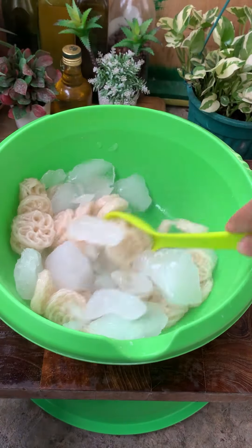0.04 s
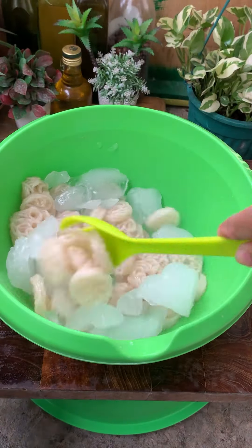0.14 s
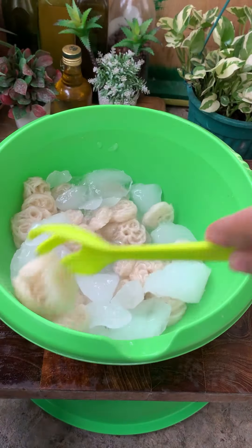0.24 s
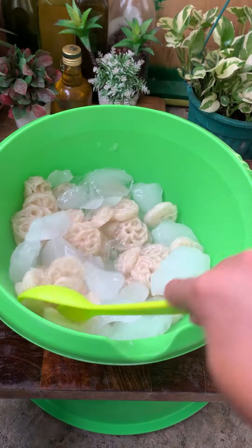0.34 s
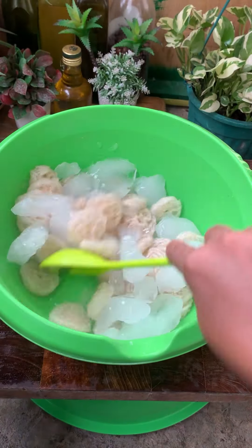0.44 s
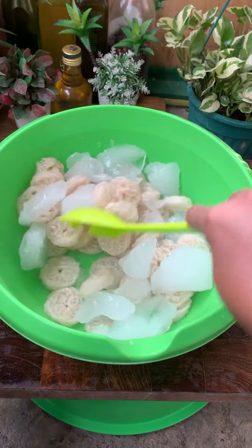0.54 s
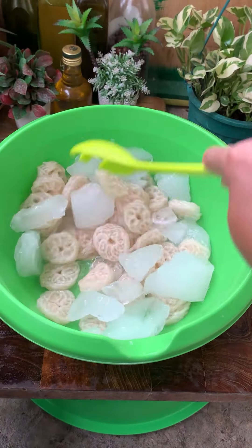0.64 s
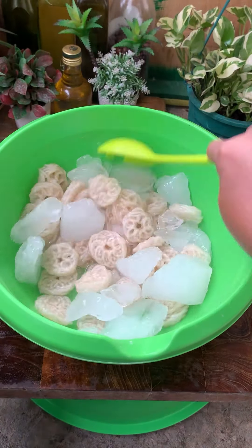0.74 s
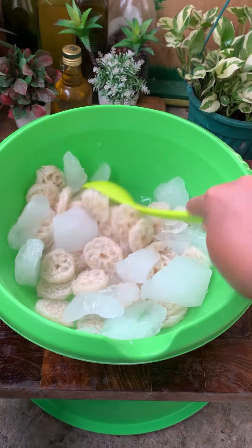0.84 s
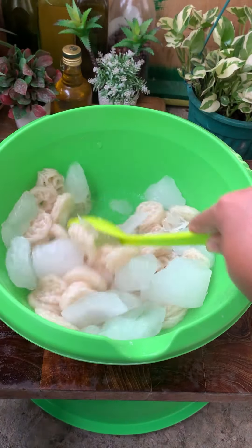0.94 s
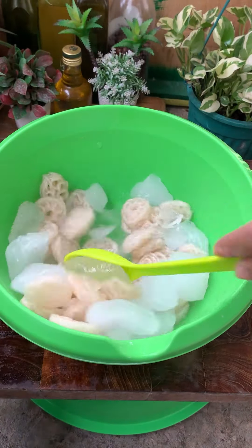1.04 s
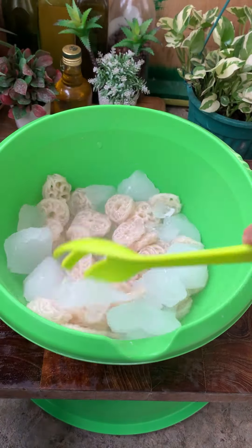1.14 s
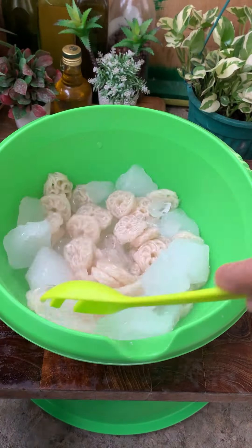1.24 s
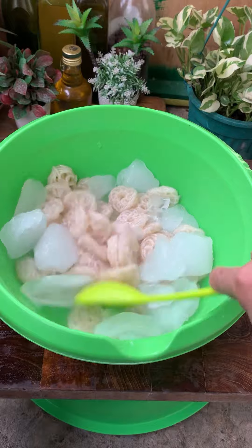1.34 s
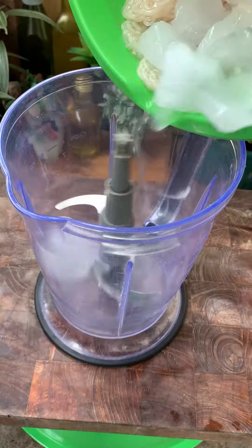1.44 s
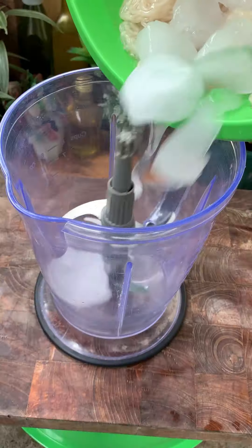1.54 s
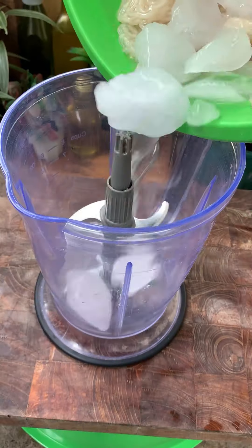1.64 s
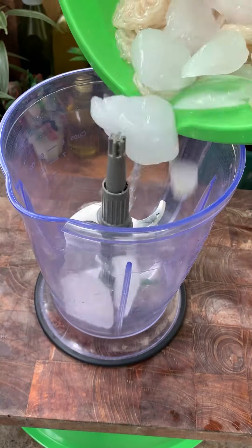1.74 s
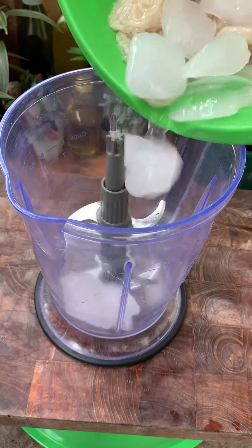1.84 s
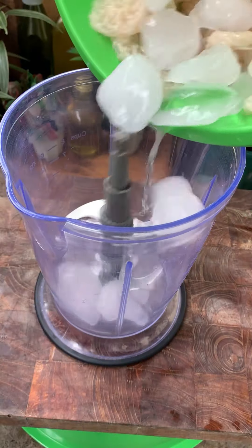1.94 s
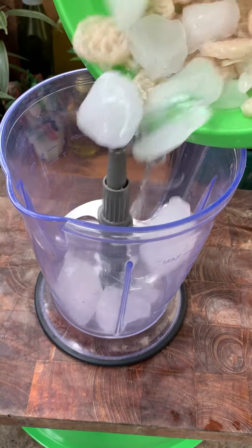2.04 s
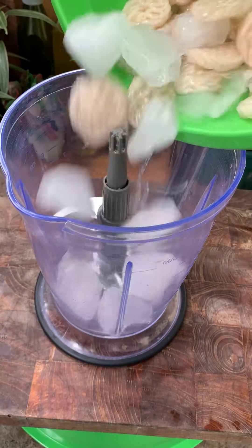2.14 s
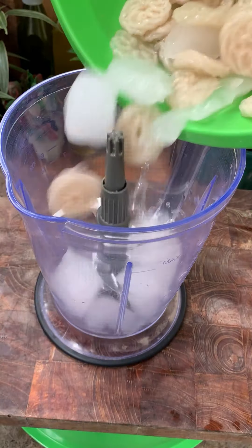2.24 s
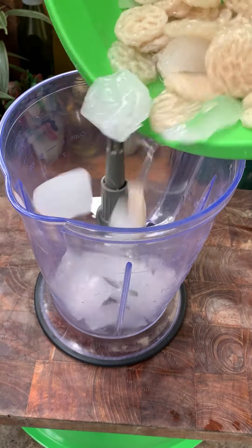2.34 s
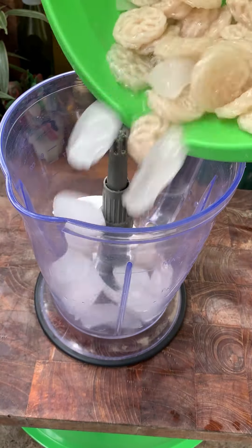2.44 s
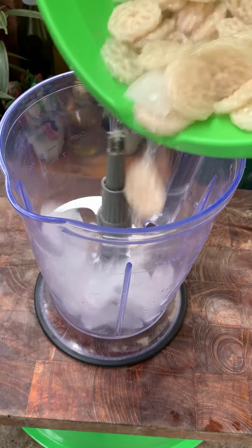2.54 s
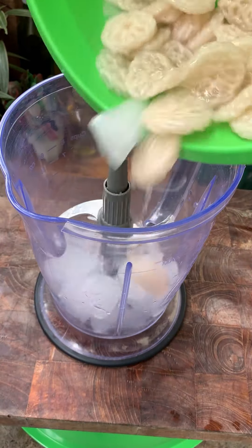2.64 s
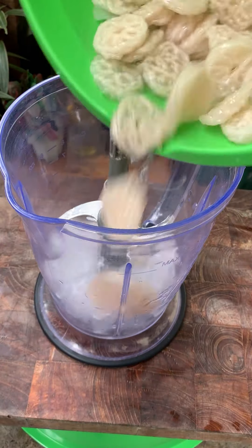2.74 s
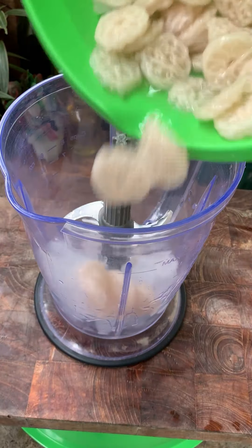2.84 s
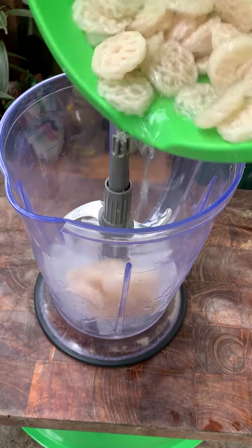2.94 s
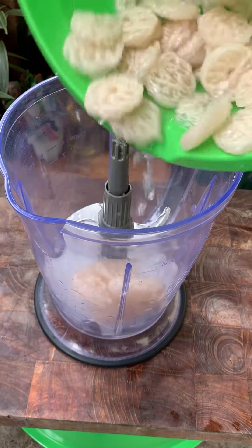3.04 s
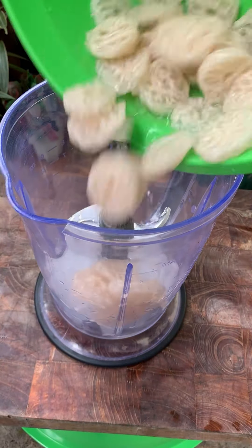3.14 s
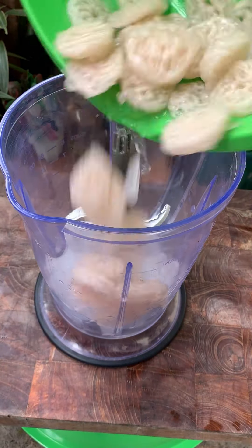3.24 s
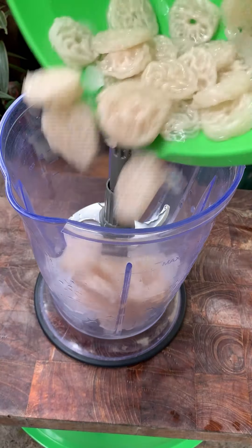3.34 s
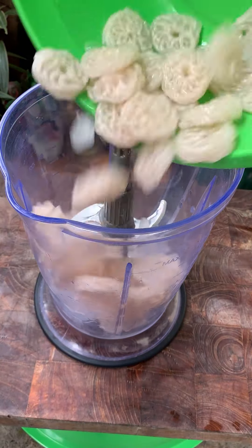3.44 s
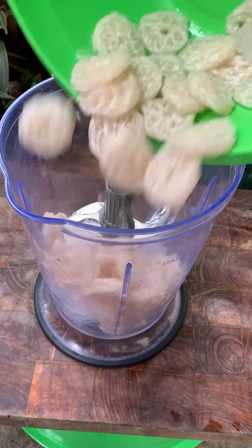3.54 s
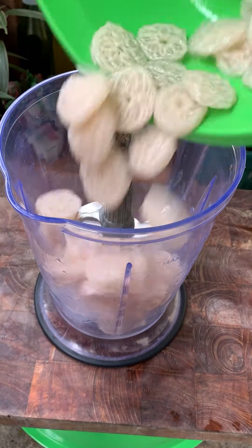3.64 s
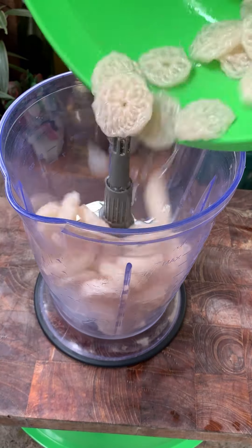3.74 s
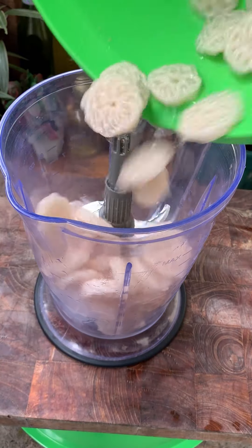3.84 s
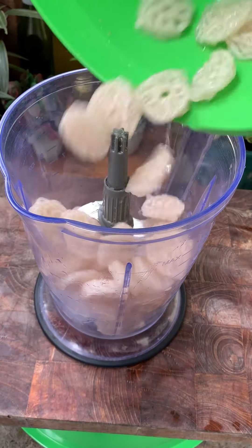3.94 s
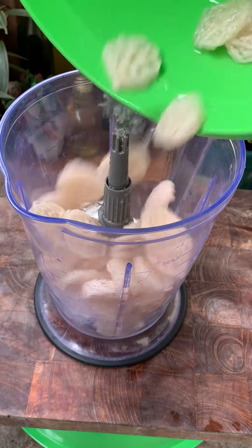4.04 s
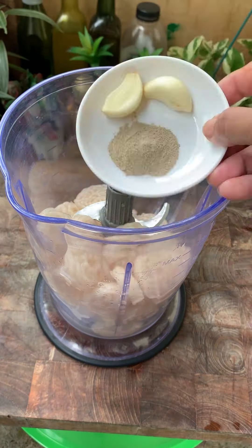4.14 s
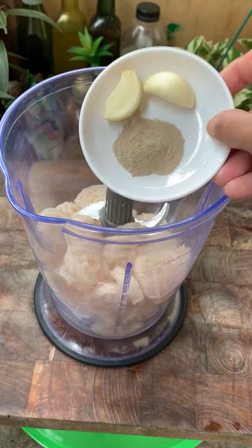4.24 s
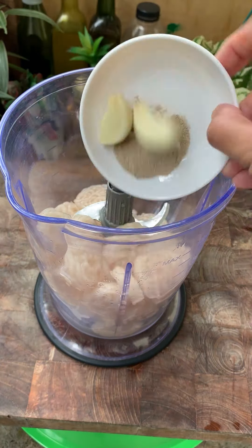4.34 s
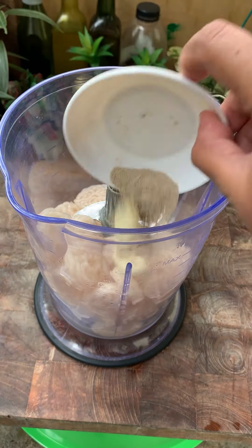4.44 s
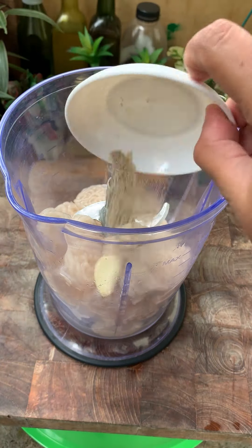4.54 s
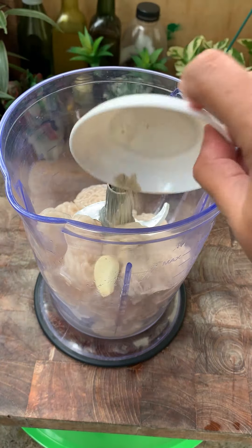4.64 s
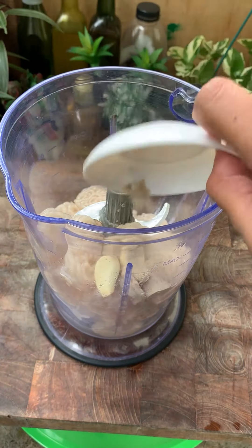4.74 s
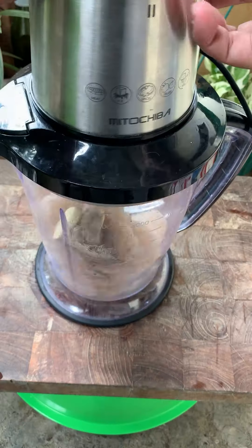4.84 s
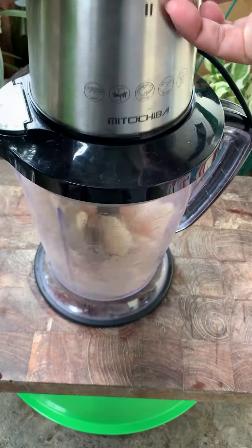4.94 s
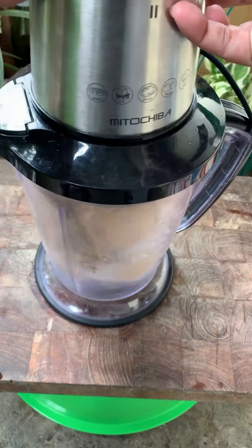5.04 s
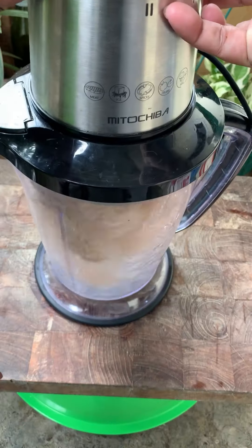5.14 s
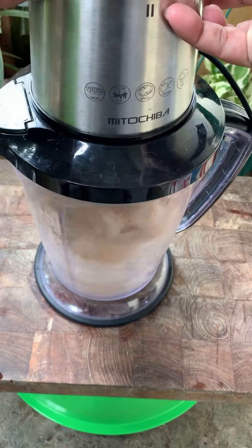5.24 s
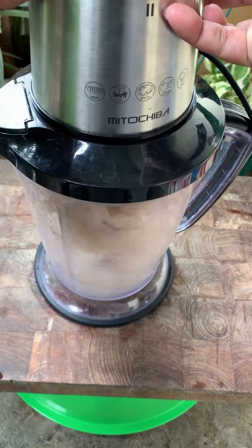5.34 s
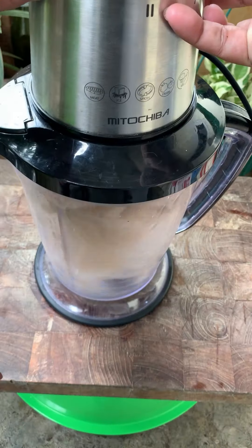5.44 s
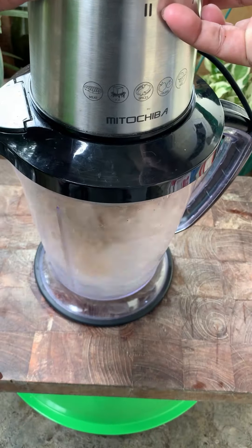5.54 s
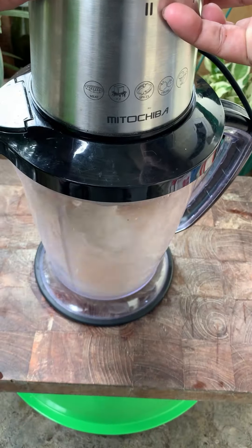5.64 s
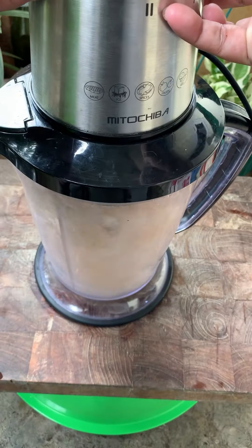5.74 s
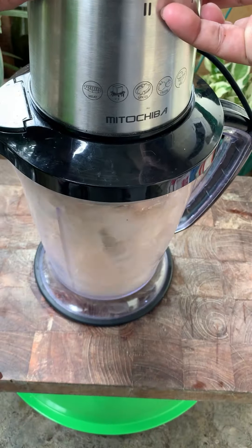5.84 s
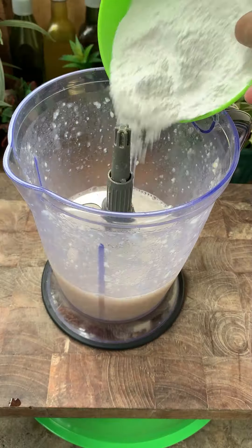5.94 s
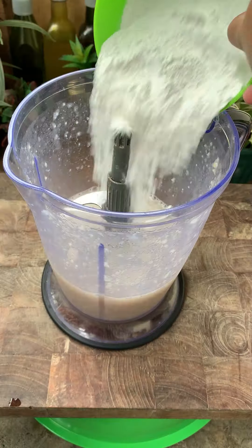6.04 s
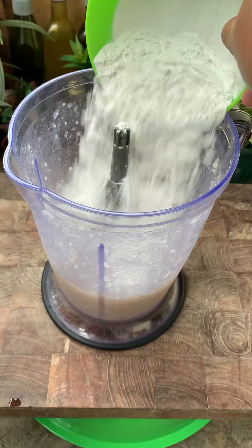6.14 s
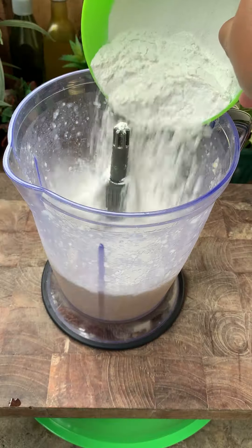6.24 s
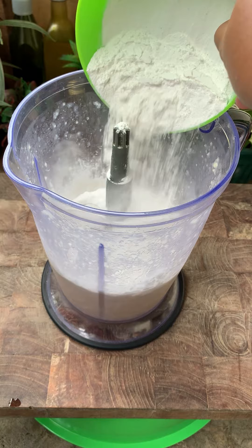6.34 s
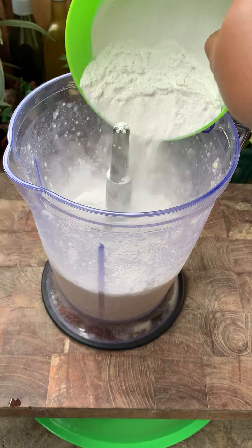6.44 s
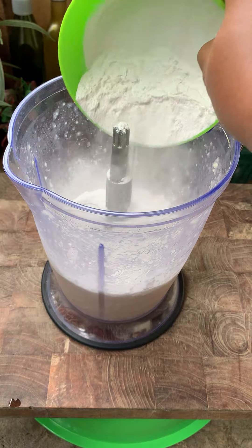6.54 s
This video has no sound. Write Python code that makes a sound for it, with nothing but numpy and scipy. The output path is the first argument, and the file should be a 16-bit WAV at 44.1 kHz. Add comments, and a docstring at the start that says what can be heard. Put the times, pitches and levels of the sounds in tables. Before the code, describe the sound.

From 0 to 1.4 seconds, ice and soaked crackers rattle and rub in a plastic bowl in uneven stirring strokes, strongest near 0.1, 0.7 and 1.3, over a low engine drone that climbs slightly and settles. At 1.4 a cut removes the engine and ice tumbles into a hollow plastic jug: loud, hard clacks until about 3.0. From 3.05 softer crackers drop with dull thuds and bright wet ticks, clustered near 3.5 and 3.8. At 4.15 it goes quiet; garlic drops lightly near 4.4 and a saucer edge knocks sharply at 4.7. From 4.8 to 5.9 a chopper starts with hard blows, a dense rattle and a narrow whine, gradually easing. Finally flour slides with a very faint hiss near 6.1 over stronger low traffic rumble. Close stereo phone, short room reflections, abrupt background changes.

```python
"""Ice and soaked crackers rattle in a plastic bowl under an engine drone; five more kitchen shots follow by cuts:
they are tipped into a plastic jug (two shots), a saucer is knocked on its rim, the chopper grinds, flour is poured.
Knocks, many small random hits and rubbing noise ring through each vessel; wet ticks are bursts of high noise.
The engine is a stack of sines, the motor a narrow band of noise, the street wavering bands of rumble.
A phone with two microphone ports stands close by."""
import sys
import numpy as np
from scipy import signal
from scipy.fft import rfft, irfft
from scipy.io import wavfile
from scipy.ndimage import uniform_filter1d

SR = 44100
rng = np.random.default_rng(int(sys.argv[2]) if len(sys.argv) > 2 else 0)


def wav_record(signal):
    """Record a signal, one row per channel, as 16-bit PCM in the file named by sys.argv[1]."""
    frames = np.transpose(np.atleast_2d(signal))
    bounded = np.clip(frames, -1, 1)
    # unit amplitude maps onto the largest positive 16-bit level
    quanta = np.round(bounded * 32767).astype(np.int16)
    wavfile.write(sys.argv[1], SR, quanta)


N = 290178

# The six shots and the street behind each. Each row: start in seconds, rumble level in dB, drone pitch in Hz,
# drone level in dB over the rumble, deep bass level in dB over the rumble.
SHOTS = [(0, -30.5, 103, -21, -13.5), (1.412, -47.5, 153, -2.5, -24), (3.05, -50, 138.3, -3.5, -5),
         (4.155, -45.5, 153, 1.5, -1.5), (4.822, -44.5, 142, -2.5, -33.5), (5.896, -36.5, 105.3, 0.5, -6)]


def undb(db):
    """Decibels to an amplitude factor."""
    return 10 ** (np.asarray(db) / 20)


def unit(x):
    """Scale to an RMS of 1."""
    return x / np.sqrt(np.mean(x ** 2))


def ring(x, hz, width_hz):
    """One resonance, gain 1 at the centre."""
    return signal.lfilter(*signal.iirpeak(min(hz, .45 * SR), hz / width_hz, SR), x)


def band(x, low_hz, high_hz):
    """Keep what lies between two frequencies, with gentle slopes."""
    return signal.sosfilt(signal.butter(2, [low_hz, high_hz], "bandpass", fs=SR, output="sos"), x)


def walk(rate):
    """Random levels held 1 / rate s and slewed; spread near 1."""
    k = int(SR / rate)
    steps = np.repeat(rng.standard_normal(N // k + 1), k)
    return 1.2 * uniform_filter1d(steps, k)[:N]


def shot(k):
    """Gate that is open during one shot, with short fades at the cuts."""
    edges = [row[0] for row in SHOTS] + [N / SR + 1]
    t = np.arange(N) / SR
    is_open = (t >= edges[k]) & (t < edges[k + 1])
    return uniform_filter1d(1. * is_open, size=200)


def swell_db(start_s, hold_s, db, rise_db_s, fall_db_s):
    """A level in dB at every sample: straight rise, hold, straight fall."""
    t = np.arange(N) / SR
    before_s = np.maximum(start_s - t, 0)
    after_s = np.maximum(t - start_s - hold_s, 0)
    return db - rise_db_s * before_s - fall_db_s * after_s


def knocks(rows, length_s, thud_db, sharp, swell=1.2, crack_share=.6, grit_db=3):
    """Each blow: a gritty swell of noise around its centre with a low thud, and a shorter bright crack."""
    body, crack, t = np.zeros(N), np.zeros(N), np.arange(4000) / SR
    lengths_s, thuds_db, _ = np.broadcast_arrays(length_s, thud_db, np.zeros(len(rows)))
    for (s, db, hz, crack_db), tau, low_db in zip(rows, lengths_s, thuds_db):
        tone_noise, crack_noise, thud_noise, chance = rng.standard_normal((4, len(t)))
        x = t / max(tau, .0005)
        grit = uniform_filter1d(np.repeat(chance[:50], 80), size=40)  # a few contacts in a row
        fade = x ** swell * np.exp(-x) * undb(grit_db * grit)
        fade = fade / fade.max()

        tone = unit(ring(ring(tone_noise, hz, hz / sharp), hz, hz))
        thud = undb(low_db) * unit(ring(thud_noise, 320, 210))
        bright_hz = np.clip(8500 + 3000 * chance[-1], 4000, 15000)
        bright = unit(ring(crack_noise, bright_hz, 15000))

        i = int(s * SR)
        n = min(len(t), N - i)
        body[i:i + n] += (undb(db - 6.5) * fade * (tone + thud))[:n]
        crack[i:i + n] += (undb(db + crack_db) * fade ** (1 / crack_share) * bright)[:n]
    return body, crack


def vessel(spells, rise_db_s, fall_db_s, floor_db, shots, blows, length_s, thud_db, modes, rate, over_db,
           smooth_db, ring_db, sharp):
    """Listed blows, many small random hits and a rubbing hiss, sounding through one vessel in the given shots."""
    each_db = np.array([swell_db(s, hold, db, rise_db_s, fall_db_s) for s, hold, db, _ in spells])
    level_db = np.maximum(each_db.max(axis=0), floor_db)
    loudest = each_db.argmax(axis=0)
    treble_db = uniform_filter1d(np.array(spells, float)[loudest, -1], size=2000)

    start, end = SHOTS[shots[0]][0], SHOTS[shots[-1] + 1][0]
    when, size, pitch, colour, length = rng.random((int(rate * (end - start)), 5)).T  # rate in hits per second
    s = start + (end - start) * when
    i = (s * SR).astype(int)
    size_db = level_db[i] + over_db - 3.5 * np.log(1 - .9 * size)  # few large, many small
    crack_db = treble_db[i] + 14 * (colour - .5) + 2
    small = np.transpose([s, size_db, 900 * 5 ** pitch, crack_db])
    large_hits = knocks(blows, length_s, thud_db, sharp)
    small_hits = knocks(small, 0.00025 + 0.0033 * length, -5.5, sharp)
    body, crack = np.add(large_hits, small_hits)

    rub = sum(shot(j) for j in shots) * undb(level_db + smooth_db)
    body = body + rub * undb(2.8 * walk(40)) * unit(band(rng.standard_normal(N), 930, 3200))
    crack = crack + rub * undb(treble_db + 7.0 + 3.0 * walk(60)) * rng.standard_normal(N)
    rung = sum(undb(db) * ring(body, hz, width) for hz, width, db in modes)
    return undb(-4) * body + undb(ring_db) * rung + band(crack, 2300, 19000)


def stirring():
    """Ice and soaked crackers rattle and rub against a plastic bowl with three broad resonances."""
    # Spells of rattle and rub. Each row: start in seconds, hold in seconds, relative level in dB,
    # treble level in dB over it.
    spells = [(0, 0.08, -24.5, -7.5), (.21, 0.03, -37, -10.5), (.31, 0.072, -31, -10),
              (.43, 0.16, -33, -6.5), (.712, 0.08, -23.5, -9), (.88, 0.047, -23, -12),
              (1.0, 0.087, -28, -10), (1.2, 0.036, -31.5, -10), (1.28, 0.0067, -22.5, -0.5),
              (1.37, 0.017, -32.5, -14.5)]
    # Blows on the bowl. Each row: start in seconds, relative level in dB, centre in Hz, crack level in dB over it.
    blows = [(0.08, -9.5, 3240, -20), (0.097, -8.5, 1730, -11.5), (0.213, -25, 2070, -24),
             (0.296, -20.5, 1300, -9), (0.373, -16, 1250, 0.5), (0.464, -23.5, 3080, 3),
             (0.54, -21, 1210, -8), (0.604, -19, 1090, -34), (0.721, -9.5, 1370, -9),
             (0.775, -13.5, 1940, -5), (1.067, -16.5, 1120, 1.5), (1.198, -13, 2000, -5.5),
             (1.279, -18, 1410, -6), (1.368, -19.5, 1700, -3)]
    # Resonances of the bowl. Each row: pitch in Hz, width in Hz, relative level in dB.
    modes = [(1270, 124, 6), (1860, 700, 3), (3000, 730, 3)]
    return vessel(spells, rise_db_s=820, fall_db_s=156, floor_db=-48, shots=[0], blows=blows, length_s=0.0016,
                  thud_db=-4.5, modes=modes, rate=230, over_db=1.0, smooth_db=-7.0, ring_db=-4.5, sharp=1.5)


def tipping():
    """Pieces land in a plastic jug; higher clacks are shorter, and softer ones keep relatively more thud."""
    # Spells of pouring. Each row: start in seconds, hold in seconds, relative level in dB,
    # treble level in dB over it.
    spells = [(1.42, 0.01, -24.5, -21.5), (1.6, 0.033, -24.5, -18.5), (1.84, 0.12, -22, -20),
              (2.17, 0.1, -18.5, -16), (2.4, .04, -27.5, -12), (2.53, 0.026, -22.5, -13.5),
              (2.76, 0.096, -27, -16.5), (2.97, 0.02, -35.5, -16.5), (3.26, 0.056, -37, -16.5),
              (3.48, .03, -48, -6.5), (3.8, 0.072, -44.5, -12), (4.1, .05, -43.5, -13)]
    # Pieces landing. Each row: start in seconds, relative level in dB, centre in Hz, crack level in dB over it.
    landings = [(1.411, -13, 990, -11), (1.433, -7.5, 750, -8.5), (1.454, 0, 1630, -19),
                (1.577, -10.5, 1580, -8), (1.602, 1.5, 1090, -10), (1.63, -13.5, 1230, -1),
                (1.675, -16, 1240, -10.5), (1.819, -9, 1590, -11.5), (1.832, -6.5, 1410, -3),
                (1.86, -2, 3240, -5.5), (1.901, -14, 1330, -3), (1.937, -14, 1470, -5.5),
                (1.982, -9, 1930, -15.5), (1.995, -15.5, 1870, -7), (2.087, -9, 1180, -29),
                (2.16, -4.5, 1170, -10), (2.175, -7.5, 1190, -14.5), (2.205, -12, 1510, 1.5),
                (2.218, -5.5, 1330, -4.5), (2.251, -12.5, 1300, -1.5), (2.277, -7, 2300, -11),
                (2.413, -12.5, 1160, -12.5), (2.518, -7.5, 1680, -2), (2.582, -17.5, 1100, -24),
                (2.738, -1.5, 2920, -15.5), (2.762, -16.5, 1230, -4.5), (2.818, -13, 1620, -11),
                (2.879, -15, 2980, -9), (2.972, -12.5, 2450, -9.5), (2.988, -19, 2180, -24),
                (3.108, -26.5, 860, -17), (3.12, -20, 1500, -11), (3.252, -19.5, 1930, -30),
                (3.288, -27.5, 1370, -11), (3.373, -28.5, 770, -34), (3.511, -29, 700, -10),
                (3.653, -30, 1520, -11), (3.738, -35.5, 1680, -5), (3.83, -25, 1280, -5),
                (3.919, -35, 1020, -7), (4.116, -18.5, 1630, -14)]
    # Resonances of the jug. Each row: pitch in Hz, width in Hz, relative level in dB.
    modes = [(450, 90, -5), (1230, 130, 0), (1500, 45, 3), (2000, 70, -1), (2620, 100, 0), (3370, 80, -4)]
    _, level_db, centre_hz, _ = np.transpose(landings)
    thud_db = -21 - 0.65 * level_db  # over the clack
    length_s = 0.0039 * (1300 / centre_hz) ** 0.13
    return vessel(spells, rise_db_s=180, fall_db_s=90, floor_db=-51.5, shots=[1, 2], blows=landings,
                  length_s=length_s, thud_db=thud_db, modes=modes, rate=110, over_db=5.5, smooth_db=-9.5,
                  ring_db=-5.5, sharp=3.2)


def ticks():
    """Crackers peel off the bowl with bright wet ticks: brief bursts of high noise, each with its own colour."""
    # The ticks. Each row: start in seconds, relative level in dB.
    tick_rows = [(2.9874, -16), (3.2884, -38), (3.4298, -32), (3.471, -17), (3.4841, -12), (3.5067, -17),
                 (3.6244, -23), (3.7818, -25), (3.8006, -13.5), (3.8458, -21), (3.8623, -22), (3.8751, -13),
                 (3.8924, -13.5), (3.9305, -27), (4.027, -29.5), (4.0472, -30)]
    out, t = np.zeros(N), np.arange(600) / SR
    fade = (1 - np.exp(-t / 0.00054)) * np.exp(-t / 0.0032)
    for s, db in tick_rows:
        noise = rng.standard_normal(len(t) + 1)
        colour_hz = np.clip(11000 + 2000 * noise[0], 6000, 15000)
        i = int(s * SR)
        out[i:i + len(t)] += undb(db - 4.5) * fade * unit(ring(noise[1:], colour_hz, 10400))
    return out


def saucer():
    """Garlic drops off the saucer, then its edge strikes the rim: abrupt knocks through three resonances."""
    # The knocks. Each row: start in seconds, relative level in dB, centre in Hz, crack level in dB over it.
    blows = [(4.304, -47, 1085, -6), (4.418, -22, 1280, -15), (4.47, -32.5, 1010, -10.5),
             (4.721, -7.5, 1454, -5)]
    # Resonances of the saucer. Each row: pitch in Hz, width in Hz, relative level in dB.
    modes = [(511, 90, -8), (1400, 300, 0), (2331, 400, -3)]
    body, crack = knocks(blows, length_s=0.009, thud_db=-3, sharp=0.44, swell=0.18)
    rung = sum(undb(db) * ring(body, hz, width) for hz, width, db in modes)
    return undb(-3) * body + rung + band(crack, 2000, 19000)


def grinding():
    """The chopper's blades throw pieces about in the closed jug: a dense rattle that slowly dies away."""
    # Spells of grinding. Each row: start in seconds, hold in seconds, relative level in dB,
    # treble level in dB over it.
    spells = [(4.84, .03, -25.5, -10), (4.915, 0.13, -24.5, -7), (5.27, 0.27, -29.5, -4.5)]
    # Blade knocks. Each row: start in seconds, relative level in dB, centre in Hz, crack level in dB over it.
    blows = [(4.832, -1, 1630, -8), (4.853, -5, 1840, -7), (4.913, -5, 1390, -4), (4.926, -12, 1310, 4),
             (4.947, -29, 1820, -10), (4.995, -14.5, 1231, 2.5), (5.092, -6, 1465, -18),
             (5.114, -8.5, 1273, -4), (5.218, -12, 2030, -4), (5.272, -14.5, 1740, 3.5),
             (5.342, -9.5, 1780, -20), (5.413, -8, 1846, -7), (5.495, -10.5, 3030, -1),
             (5.541, -9, 1650, -4.5), (5.658, -16, 2200, 6.5), (5.837, -12.5, 2340, -7),
             (5.885, -16.5, 1870, 3)]
    # Resonances of the closed jug. Each row: pitch in Hz, width in Hz, relative level in dB.
    modes = [(269, 110, 4), (816, 41, 7.5), (1160, 74, 0), (1936, 100, -2), (2920, 1500, -3)]
    return vessel(spells, rise_db_s=460, fall_db_s=21.7, floor_db=-40, shots=[4], blows=blows, length_s=0.0037,
                  thud_db=-13.0, modes=modes, rate=390, over_db=5.0, smooth_db=-0.5, ring_db=-8.5, sharp=1.48)


def motor():
    """A narrow whine under the grinding, twice-filtered noise that comes and goes."""
    whine_hz, width_hz, whine_db = 1790, 110, -37
    whine = ring(ring(rng.standard_normal(N), whine_hz, width_hz), whine_hz, width_hz)
    return undb(3 * walk(14)) * undb(whine_db) * unit(whine)


def engine():
    """A firing rate that climbs and settles carries three strong partials and weaker, fluttering upper ones."""
    # Strong partials swelling in turn. Each row: time in seconds, levels of the 2nd, 3rd and 4th partial in dB.
    partial_levels = [(0, -30.5, -40, -29), (.2, -27.5, -29, -32.5), (.5, -28, -20.5, -32.5),
                      (.72, -32, -26, -24), (.85, -49, -29, -44.5), (1.03, -32.5, -35, -25.5),
                      (1.18, -39, -43, -32.5), (1.29, -39, -24.5, -31), (1.41, -34, -32, -33)]
    # Upper partials. Each row: multiple of the firing rate, level in dB over the mean of the strong three.
    upper_partials = [(5, -15.5), (6, -15), (7, -12.5), (9, -19.5)]
    t = np.arange(N) / SR
    s, *columns = np.transpose(partial_levels)
    main_db = [np.interp(t, s, c) for c in columns]
    start_hz, end_hz, climb_s = 46.05, 49.7, .4
    hz = end_hz - (end_hz - start_hz) * np.exp(-(t / climb_s) ** 2)
    turn = 2 * np.pi * np.cumsum(hz * (1 + 0.0066 * walk(25))) / SR

    out = np.zeros(N)
    for k, db in enumerate(main_db):
        out += undb(db + 0.52 * walk(30)) * np.sin((k + 2) * turn + 1.2 * k * k)
    mean_db = np.mean(main_db, axis=0)
    for multiple, db in upper_partials:
        out += undb(mean_db + db + 2.5 * walk(15)) * np.sin(multiple * turn + 6 * rng.random())
    return np.sqrt(2) * shot(0) * out  # sine levels count as RMS


def flour():
    """A faint high hiss as the powder slides, over the steady hiss of the room."""
    slide_db = swell_db(6.11, 0, -60.5, rise_db_s=500, fall_db_s=130) + 2.7 * walk(50)
    air_db = -73 + 1.5 * walk(20)
    return (undb(slide_db) + undb(air_db)) * band(rng.standard_normal(N), 3000, 17000)


def street():
    """Distant traffic: octave bands of rumble that waver alone, with a drone and deep bass set for each shot."""
    # Spectrum of the rumble. Each row: frequency in Hz, relative level in dB.
    spectrum = [(30, -34), (60, -17), (108, -4.5), (160, -6.5), (300, -12), (560, -26.5), (1600, -32.5),
                (3700, -47), (8000, -74.5)]
    hz, db = np.transpose(spectrum)
    f = np.fft.rfftfreq(N, 1 / SR) + 1
    shape = undb(np.interp(np.log(f), np.log(hz), db))
    rumble = 0
    for centre in 45 * 2. ** np.arange(9):
        share = np.cos(np.pi / 2 * np.clip(np.log2(f / centre), -1, 1))
        octave = irfft(rfft(rng.standard_normal(N)) * shape * share, N)
        rumble = rumble + undb(2.6 * walk(6)) * octave
    rumble = unit(rumble)

    noise, out = rng.standard_normal(N), 0
    deep = unit(band(noise, 48, 80))
    for k, (_, level_db, drone_hz, drone_db, deep_db) in enumerate(SHOTS):
        drone = unit(ring(ring(noise, drone_hz, 33), drone_hz, 33))
        mix = rumble + undb(drone_db) * drone + undb(deep_db) * deep
        out = out + shot(k) * undb(level_db) * mix
    return out


def ports(x):
    """The same sound at both ports, shifted in phase and level by the phone's body."""
    # Level between the ports. Each row: frequency in Hz, left minus right in dB.
    level_rows = [(60, 0), (200, -4), (380, -6.5), (800, 0), (2400, -2), (4000, 0.)]
    # Phase between the ports. Each row: frequency in Hz, lead of the left in radians.
    phase_rows = [(0, 0), (400, .3), (780, 1.3), (1380, -.3), (2670, 1.2), (3790, 1.2), (5200, 3.14),
                  (14500, 15.7), (17000, 18.5)]
    f = np.fft.rfftfreq(N, 1 / SR)
    hz, db = np.transpose(level_rows)
    level_db = np.interp(np.log(f + 1), np.log(hz), db)
    phase = np.interp(f, *np.transpose(phase_rows))
    half = undb(level_db / 2) * np.exp(.5j * phase)  # each port takes half of the difference
    return irfft(rfft(x) * np.array([half, 1 / half]), N)


def heard(near):
    """A near sound at the ports; table and walls return a short, different tail to each."""
    t60_s, room_db = 0.12, -13
    t = np.arange(8000) / SR
    room = []
    for _ in range(2):
        tail = band(rng.standard_normal(len(t)), 680, 7200) * 1000 ** (-t / t60_s)
        room.append(signal.fftconvolve(near, tail / np.sqrt(np.sum(tail ** 2)))[:N])
    return ports(near) + undb(room_db) * np.array(room)


def scene():
    """Each near sound is gated to its own shots, over the engine, street and flour."""
    near = heard(stirring()) * shot(0)
    near = near + heard(tipping() + ticks()) * (shot(1) + shot(2))
    near = near + heard(saucer()) * shot(3)
    near = near + heard(grinding() + motor()) * shot(4)
    return near + ports(engine() + street() + flour())


def record(dry):
    """The phone drops the deepest bass, rounds the loudest peaks and cuts the top."""
    low_cut = signal.butter(2, 38, "highpass", fs=SR, output="sos")
    top_cut = signal.ellip(12, .2, 80, 15850, fs=SR, output="sos")
    dry = signal.sosfilt(low_cut, dry)
    rounded = 1.3 * np.tanh(dry / 1.3)
    return signal.sosfilt(top_cut, rounded)


dry = scene()
out = record(dry)
wav_record(out)
```